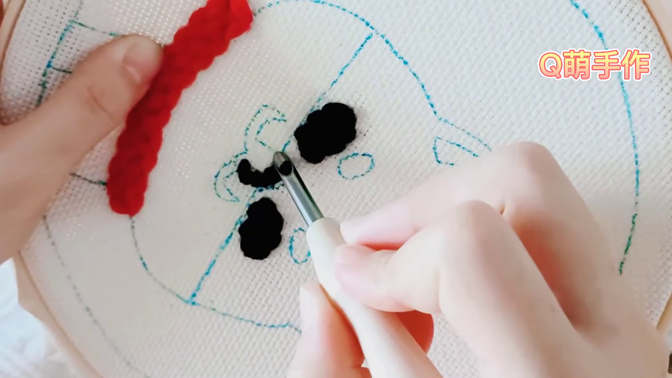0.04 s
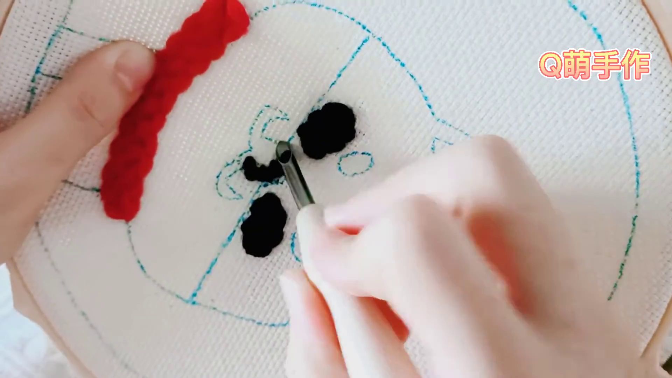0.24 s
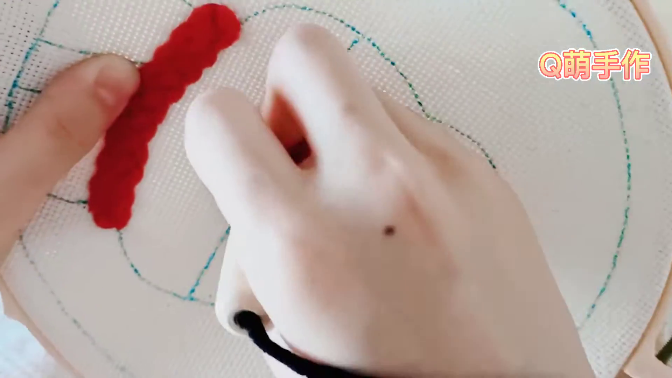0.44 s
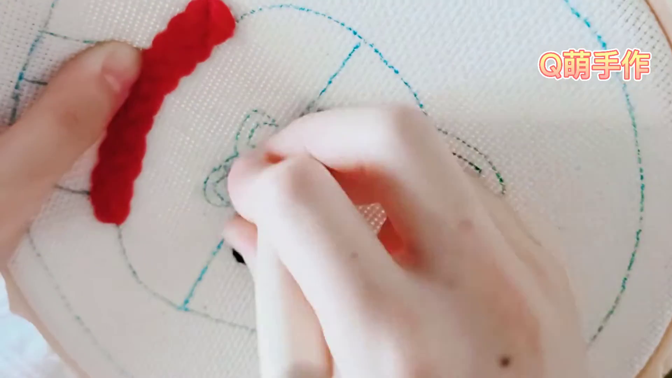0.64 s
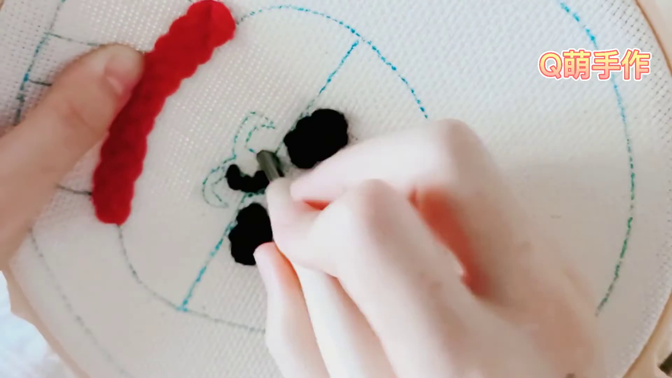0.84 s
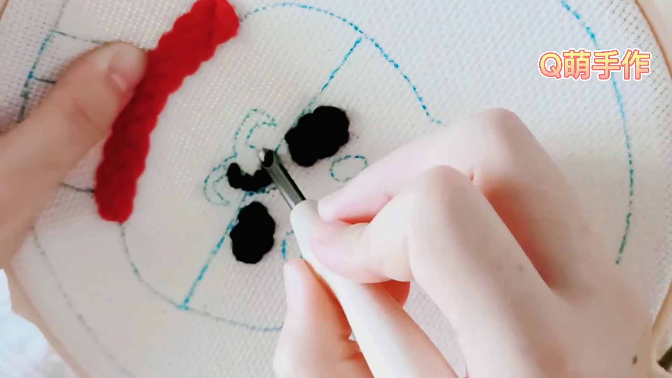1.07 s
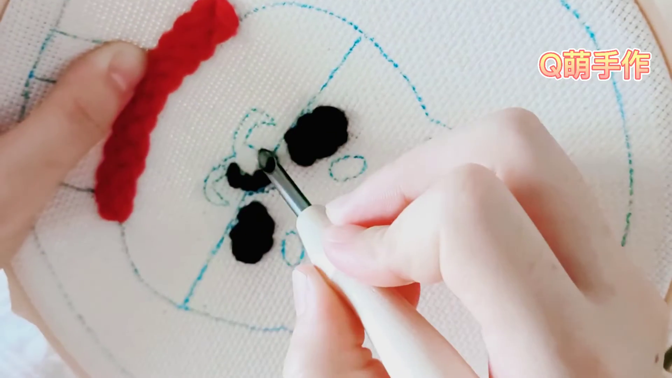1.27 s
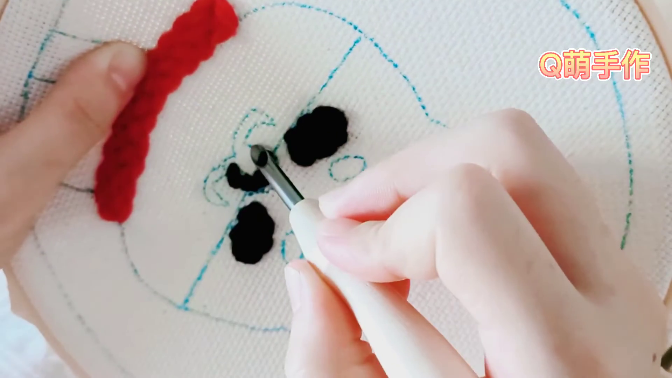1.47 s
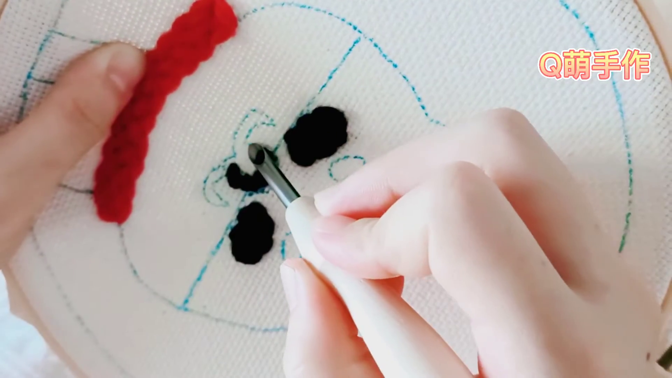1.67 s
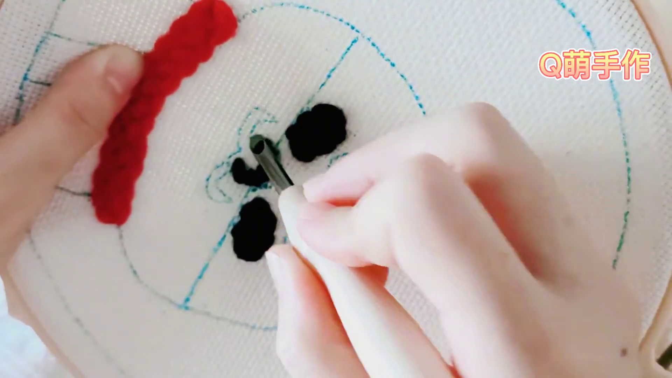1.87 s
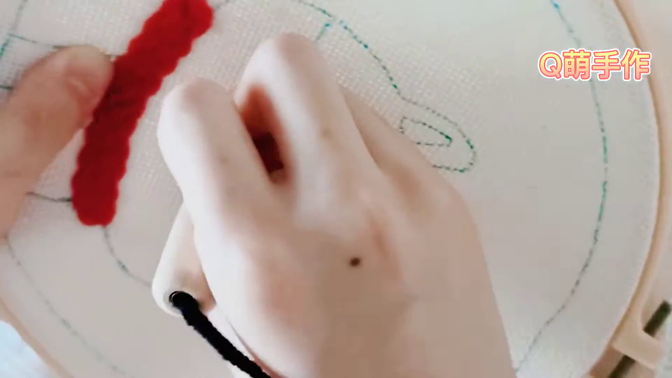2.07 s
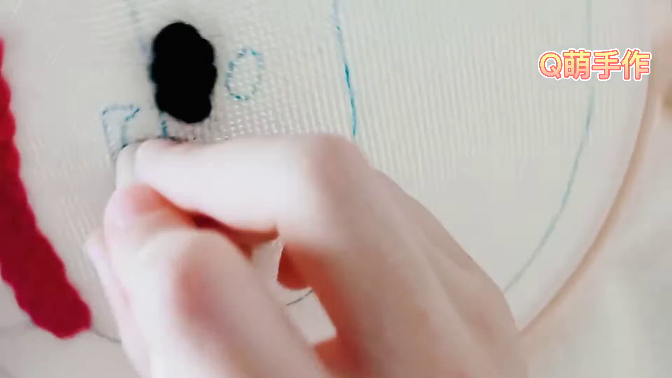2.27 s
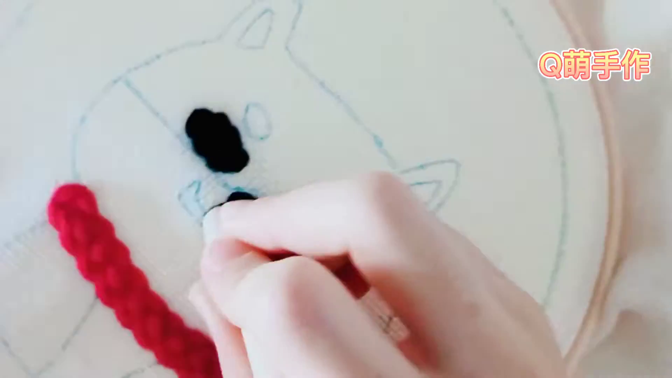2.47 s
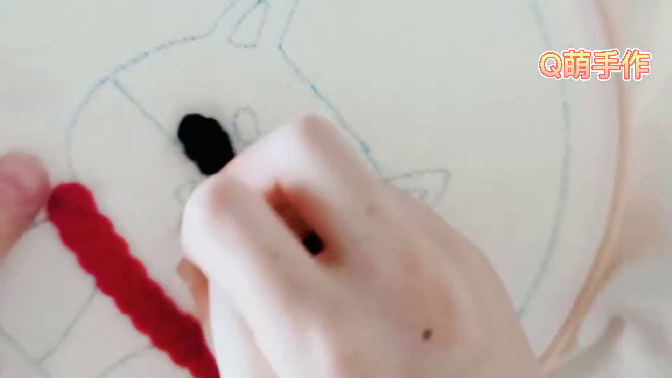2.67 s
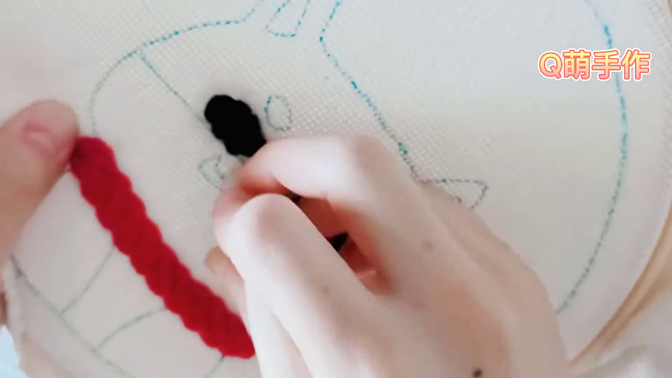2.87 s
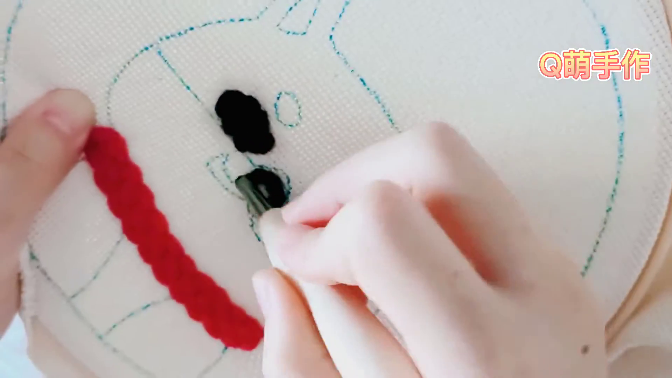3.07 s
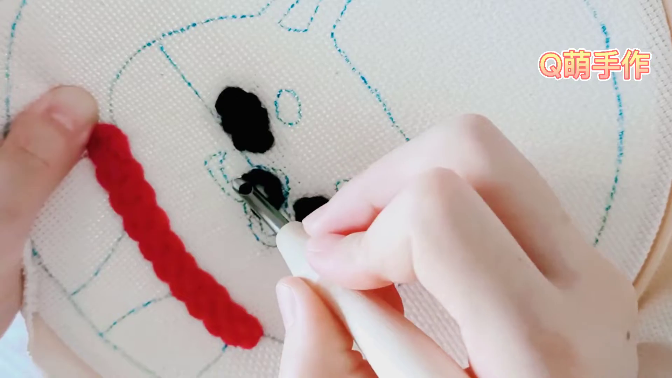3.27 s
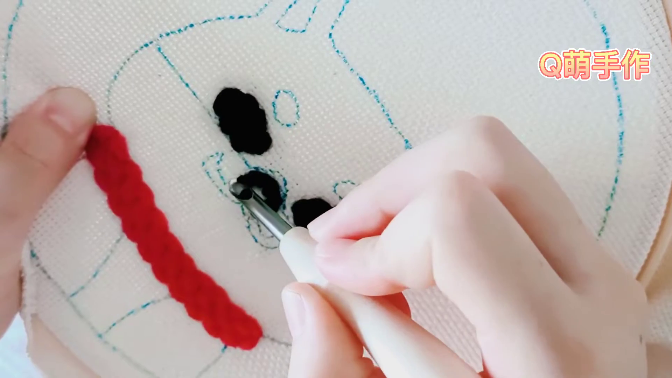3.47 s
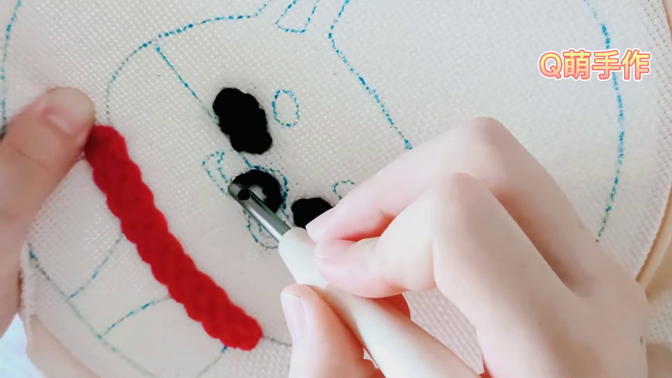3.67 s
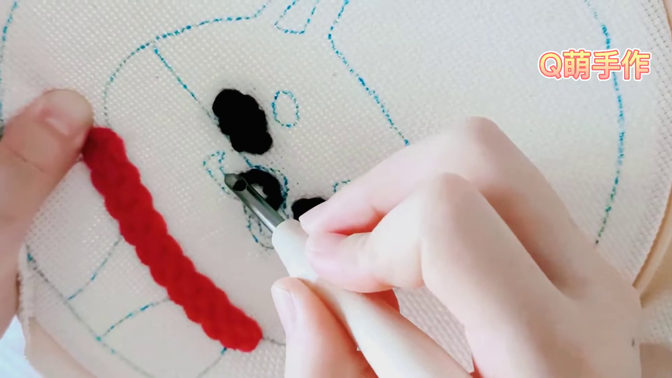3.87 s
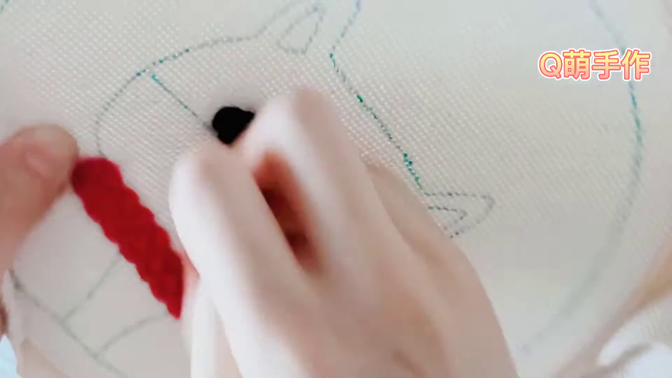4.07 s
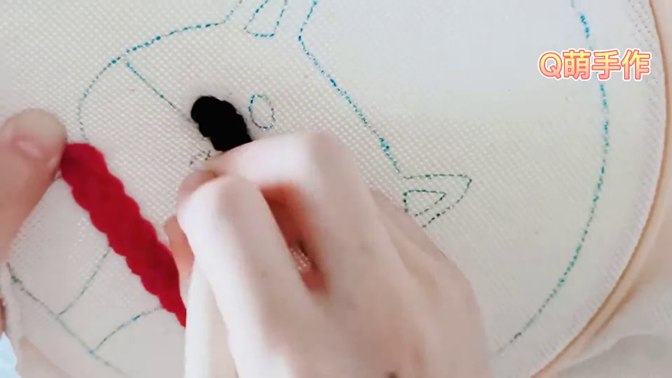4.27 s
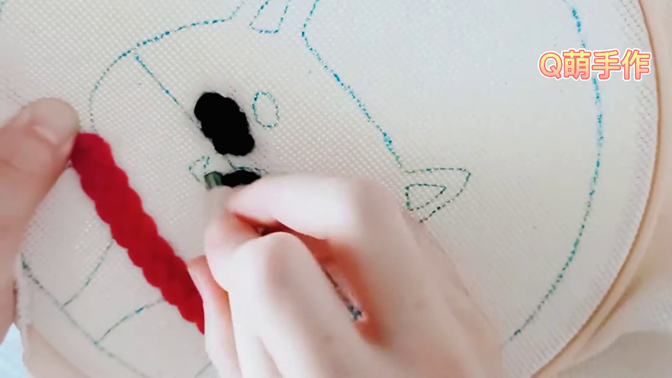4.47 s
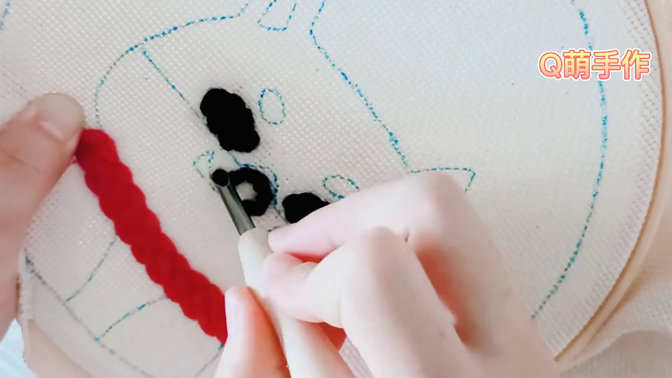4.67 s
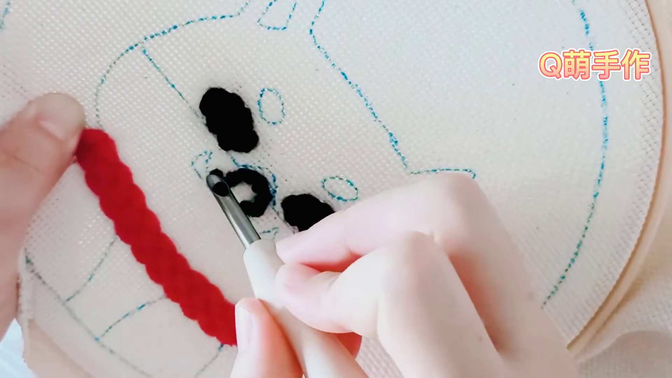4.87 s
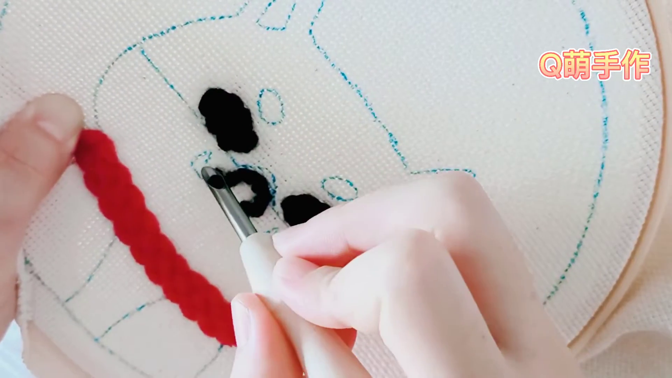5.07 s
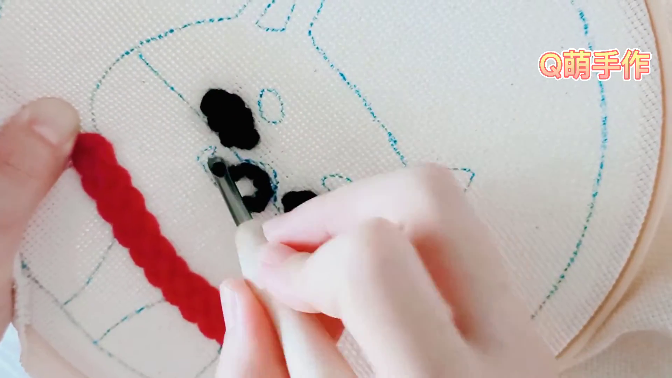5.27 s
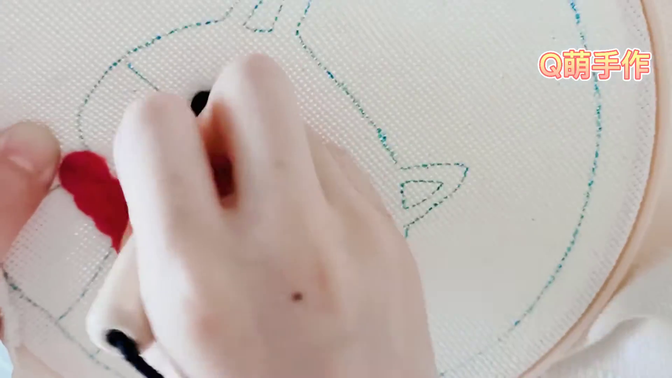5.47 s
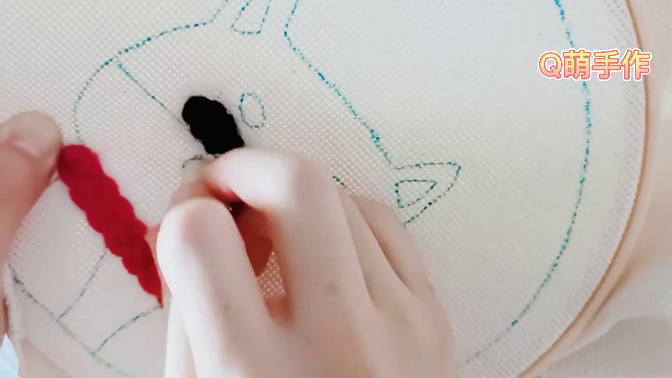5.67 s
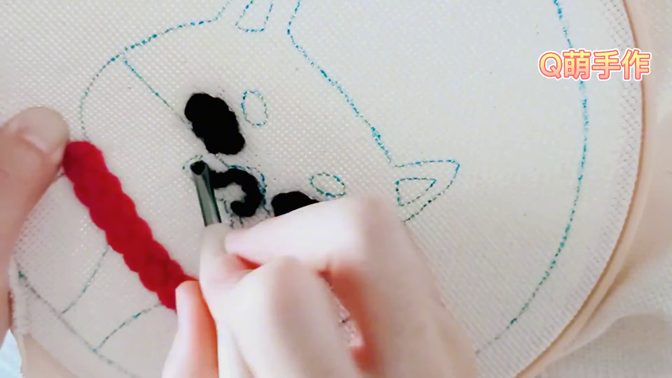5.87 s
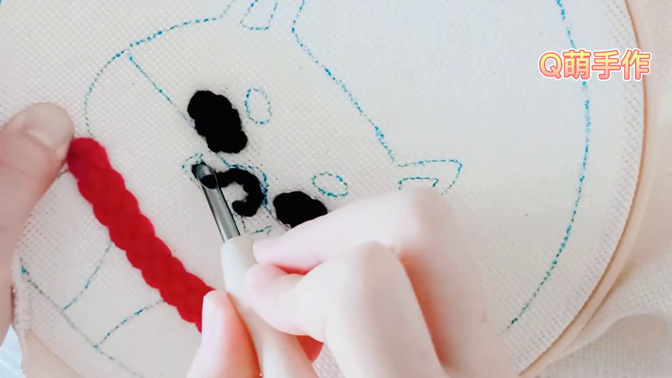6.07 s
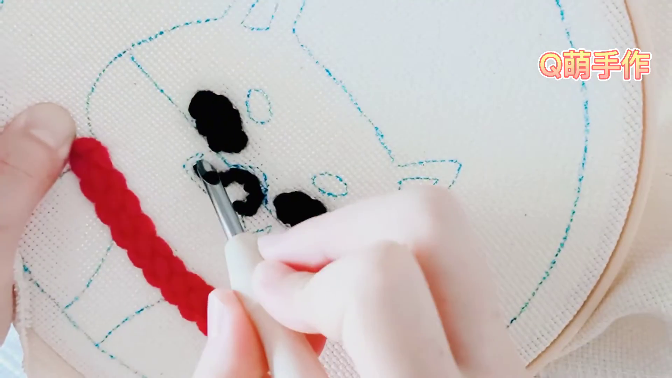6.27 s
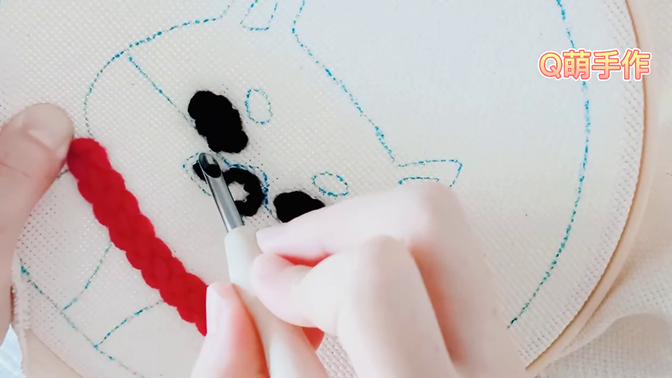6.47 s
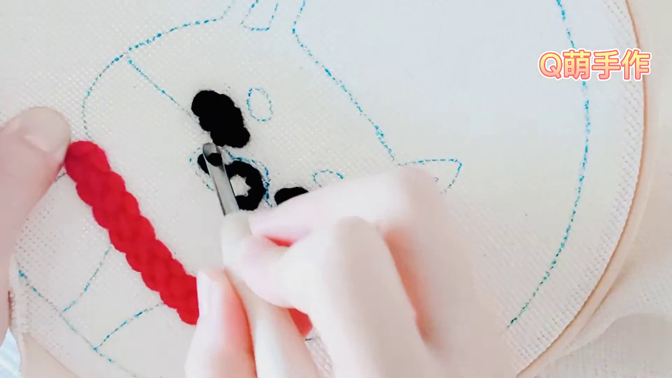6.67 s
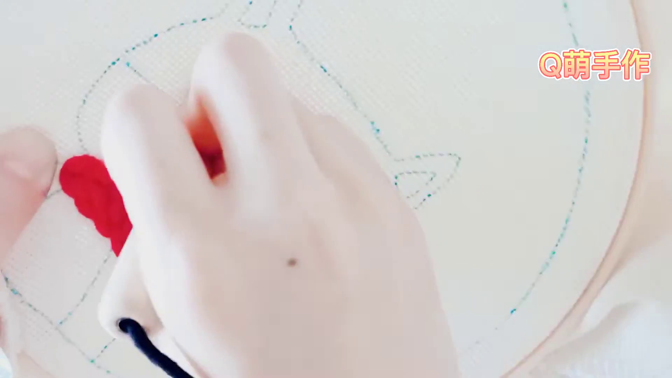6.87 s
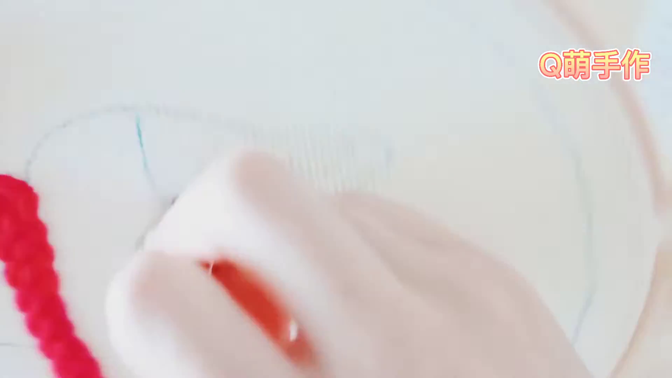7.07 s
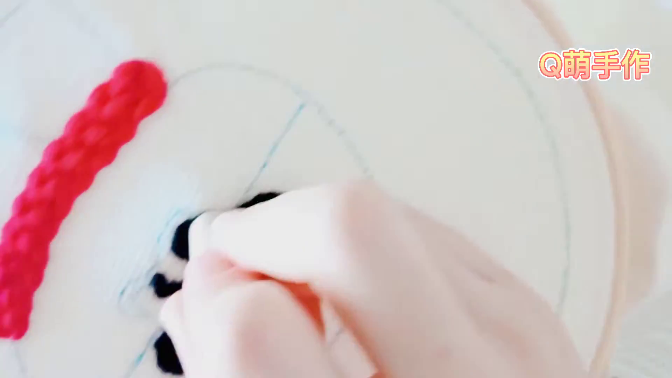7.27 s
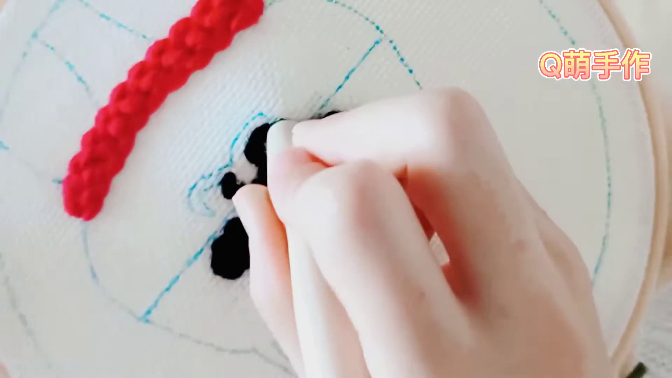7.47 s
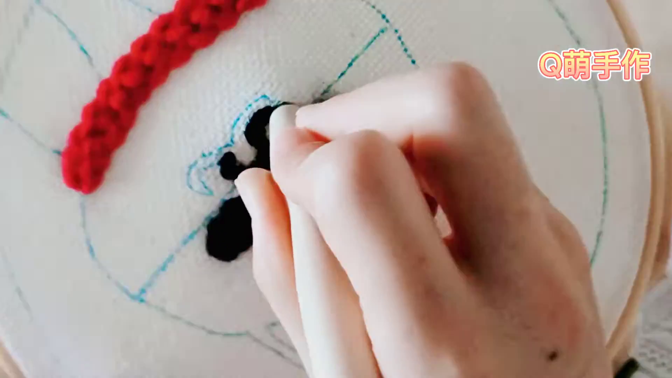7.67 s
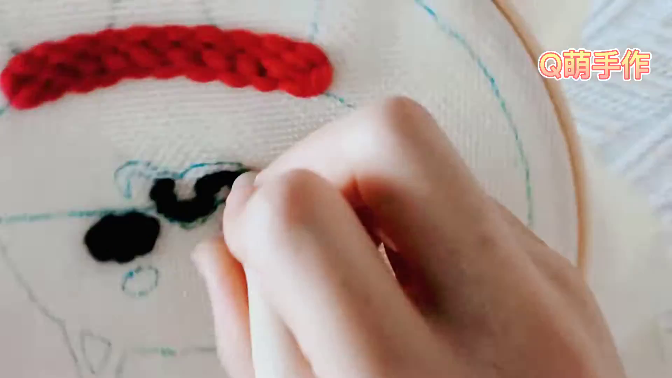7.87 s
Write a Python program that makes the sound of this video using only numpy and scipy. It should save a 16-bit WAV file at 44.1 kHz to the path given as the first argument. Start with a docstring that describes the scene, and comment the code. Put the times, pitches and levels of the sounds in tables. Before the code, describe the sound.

Very close to a phone microphone in a quiet room, a punch needle pierces tight hooped cloth five times, one to two seconds apart. Each stitch is a loud, dry pop with a brief fibrous rasp and a low thud as the handle presses the fabric. Smaller pops cluster around some stitches, yarn swishes softly as the needle withdraws, and fingers rustle faintly. Low murmur and hiss continue.

```python
"""In a quiet room, close to a phone, a punch needle is pushed five times through cloth stretched in a hoop.
Each stitch pops as threads release their tension, rasps by stick-slip friction along the shaft, and thuds as
the handle presses the cloth; cloth and hoop ring on as damped modes, like a slack drum, and the room echoes.
Lesser pops and fainter scrapes surround the stitches, yarn swishes softly as the needle is drawn back, and
fingers rustle on the hoop, over a low room murmur of randomly varying level and microphone hiss."""
import sys
import numpy as np
from scipy import signal
from scipy.fft import rfft, irfft, next_fast_len
from scipy.io import wavfile

SR = 44100
rng = np.random.default_rng(int(sys.argv[2]) if len(sys.argv) > 2 else 0)


def dump_mix(stems):
    """Bounce the given channels to the path in sys.argv[1] as a 16-bit WAV at rate SR."""
    frames = np.atleast_2d(stems).T  # one column per channel
    limited = np.clip(frames, -1, 1)  # hard clip at full scale
    pcm = np.round(limited * 32767).astype(np.int16)
    wavfile.write(sys.argv[1], SR, pcm)


N = 349713
TIME = np.arange(N) / SR

# a stitch: the tip pierces the cloth, the shaft rasps through, the handle lands after the plunge:
# pierce_s, pop_db, snap_corner_hz, rasp_db, plunge_s, thud_db, thud_pitch_hz
STITCHES = [(0.4316, 0, 1560, -26.5, 0.017, -27, 160), (1.9995, -1.8, 2380, -35.5, 0.055, -28, 181),
            (4.1508, -2, 1060, -29, 0.022, -12, 163), (5.4641, -4.5, 1320, -32.5, .0259, -18, 168),
            (6.8452, 0, 2110, -32, .0364, -18.5, 161)]


def undb(db):
    """Amplitude gain is the antilogarithm of a twentieth of the decibel level."""
    return 10 ** (np.asarray(db) / 20)


def contour(points, hz):
    """A spectral curve is read by linear interpolation of its points on a log-frequency axis."""
    point_hz, value = np.transpose(points)
    return np.interp(np.log(np.maximum(hz, 1)), np.log(point_hz), value)


def colour(x, points):
    """Linear filtering multiplies the spectrum by a gain curve, here without phase shift."""
    size = next_fast_len(x.shape[-1], real=True)
    gain = undb(contour(points, np.fft.rfftfreq(size, 1 / SR)))
    return irfft(rfft(x, size) * gain, size)[..., :x.shape[-1]]


def unit(x):
    """Normalization to a root-mean-square amplitude of 1."""
    return x / np.sqrt(np.mean(x ** 2))


def pair(count, alike):
    """Interchannel correlation: left and right noise share the fraction alike of their power."""
    common, left, right = rng.standard_normal((3, count))
    alike = np.clip(alike, 0, 1)
    return np.sqrt(alike) * common + np.sqrt(1 - alike) * np.array([left, right])


def pan(x, db):
    """Interchannel level difference: the left exceeds the right by db."""
    return x * undb(np.array([[db], [-db]]) / 2)


def add(out, s, x):
    """Superposition: a sound is summed in from time s."""
    i = max(int(round(s * SR)), 0)
    out[:, i:i + x.shape[-1]] += x[..., :max(N - i, 0)]


def impulse(points, size=2048):
    """Minimum phase: the folded cepstrum gives the causal pulse whose energy arrives earliest."""
    log_gain = np.log(undb(contour(points, np.fft.rfftfreq(size, 1 / SR))))
    cepstrum = irfft(log_gain)
    cepstrum[1:size // 2] *= 2
    cepstrum[size // 2 + 1:] = 0
    return irfft(np.exp(rfft(cepstrum)))


def ring(modes, count):
    """Modal decay: after a blow each mode is a sinusoid that loses 60 dB in its t60."""
    t = TIME[:count]
    return sum(undb(db - 60 * t / t60) * np.sin(2 * np.pi * hz * t) for hz, db, t60 in modes)


def walk(rate):
    """Random modulation: independent normal values, rate per second, joined by straight lines."""
    steps = rng.standard_normal(N // 64)
    return np.interp(TIME * rate, np.arange(len(steps)), steps)


def ports(x):
    """Near-field reception: a close sound differs in level and phase between two ports at each pitch."""
    # level of left over right: frequency_hz, balance_db
    balance = [(60, 2), (110, 10), (200, -0.5), (380, 1), (700, -1.5), (1290, -1), (2380, 1), (4400, -11.5),
               (8120, 7), (15000, -15)]
    # phase by which left leads: frequency_hz, lead_rad
    lead = [(200, 0), (700, .15), (1500, .5), (2500, -.4), (4500, 1.2), (7400, -1.4), (15000, -1.3)]
    size = next_fast_len(N, real=True)
    hz = np.fft.rfftfreq(size, 1 / SR)
    # half of each difference goes to either side
    half = undb(contour(balance, hz) / 2) * np.exp(.5j * contour(lead, hz))
    return irfft(rfft(x, size) * np.array([half, 1 / half]), size)[:, :N]


def background(murmur_db=-57.47, vary_db=1, hiss_db=-59, hiss_pan_db=1):
    """Random noise: a low room murmur whose level varies at random, under the even hiss of two microphones."""
    # relative spectrum of the room murmur: frequency_hz, level_db
    murmur_points = [(15, -76), (25, -18), (43, -36), (62, -7), (92, 1), (124, -1.5), (224, -2),
                     (257, -4.5), (284, -5), (513, -9.5), (776, -12.5), (2210, -27.5), (2800, -26),
                     (3640, -52), (6160, -120)]
    # relative spectrum of the microphone hiss: frequency_hz, level_db
    hiss_points = [(2000, -13), (2900, -12.5), (3850, 0.5), (4300, -3), (4700, 0.5), (5050, -7.5),
                   (5900, -5), (6350, 4.5), (7000, -1), (7600, -2), (8300, -8.5), (12000, -9.5),
                   (15000, -5.5)]
    murmur = unit(colour(pair(N, alike=0.12), murmur_points))
    murmur = murmur * undb(murmur_db + vary_db * walk(rate=9))
    hiss = unit(colour(rng.standard_normal((2, N)), hiss_points)) * undb(hiss_db)
    return murmur + pan(hiss, hiss_pan_db)


def pops(snap_db=19, twang_hz=540, twang_t60=0.0065, usual_corner_hz=1500):
    """Release of elastic tension: threads give way, the taut cloth twangs, the needle cracks and rings."""
    # lesser pops: threads that snag and let go, and single echoes of the stitches' pops:
    # start_s, pop_db, snap_corner_hz
    lesser_pops = [(0.3748, -17, 1410), (0.981, -49, 2800), (2.0433, -11, 900), (2.0622, -25, 1300),
                   (4.0659, -32, 1700), (4.1642, -15, 1750), (5.9497, -42, 2000), (6.8581, -9.5, 1340),
                   (6.9056, -35, 1500), (7.2197, -38, 2800), (7.833, -37.5, 1210), (7.8870, -39.5, 1600)]
    # relative spectrum of the cloth's snap: frequency_hz, level_db
    snap_points = [(30, -33), (60, -38.5), (110, 5), (200, 1), (340, -0.5), (560, 5), (780, 0.5), (1000, 0),
                   (1500, -4), (1950, -16), (2600, -4.5), (5000, -0.5), (16000, -6)]
    # the needle cracks briefly against its handle: frequency_hz, level_db, t60_s
    crack_modes = [(2800, -24, 0.0007), (3570, -13.5, 0.009), (4420, -14.5, 0.011), (6600, -14, 0.011),
                   (8440, -11.5, 0.0038), (12000, -11.5, 0.0022), (14500, -11, 0.002)]
    # modes of the hollow steel needle: frequency_hz, level_db, t60_s
    steel_modes = [(7500, -2.5, 0.0062), (7310, -3.5, 0.013)]
    out = np.zeros((1, N))
    snap = undb(snap_db) * impulse(snap_points)
    twang = ring([(twang_hz, 0, twang_t60)], count=2048)
    crack, steel = ring(crack_modes, count=2048), ring(steel_modes, count=2048)
    for s, db, corner_hz, *_ in STITCHES + lesser_pops:
        # the sharper the snap, the less the cloth twangs and the more the needle cracks and rings
        octaves = np.log2(corner_hz / usual_corner_hz)
        twang_gain = undb(-13 - 9.5 * octaves)
        crack_gain = undb(-24 + 16.5 * octaves)
        steel_gain = undb(-41 + 43.5 * octaves)
        # a slower release rounds the pulse
        rounding = signal.butter(3, corner_hz, fs=SR, output="sos")
        cloth = signal.sosfilt(rounding, snap + twang_gain * twang)
        needle = crack_gain * crack + steel_gain * steel
        add(out, s, undb(db) * (cloth + needle))
    return ports(out[0])


def hoop(x, ring_db=-65):
    """Modal excitation: convolution lets every blow leave the cloth and its wooden hoop ringing faintly."""
    # modes of cloth and hoop: frequency_hz, level_db, t60_s
    cloth_modes = [(86.5, -18, .22), (140.7, -6, 0.35), (201, -21, 0.17), (283, -6.5, 0.52),
                   (311.5, 6, 0.14), (502, 3.5, .21), (612, -4, 0.28), (682, -1.5, 0.3), (775, -5, .2),
                   (861, -7.5, 0.45), (1044, 1.5, 0.2)]
    response = ring(cloth_modes, count=22000)
    return undb(ring_db) * signal.fftconvolve(x, response[None], axes=1)[:, :N]


def room(x, wet_db=-17, build_s=0.0036, slap_s=.0608, slap_db=-27, count=26000):
    """Reverberation: echoes thicken in milliseconds and fade band by band; one dull echo stands out."""
    # relative spectrum of the echo: frequency_hz, level_db
    echo_points = [(40, -8), (140, 1.5), (300, -2), (550, -2), (900, 0.5), (2000, 5), (4000, 2),
                   (7500, 3.5), (15000, 10)]
    # decay time of the echo: frequency_hz, t60_s
    echo_t60 = [(100, 0.27), (400, 0.51), (1200, 0.24), (4000, 0.53), (7500, 0.37), (12000, 0.32)]
    f, t, bands = signal.stft(pair(count, alike=0.36), SR, nperseg=256)
    fade = undb(-60 * t / contour(echo_t60, f)[:, None])
    tail = signal.istft(bands * fade, SR)[1][:, :count]
    tail = tail * (1 - np.exp(-(TIME[:count] / build_s) ** 2))
    # unit energy before the echo's colour and level
    tail = undb(wet_db) * colour(unit(tail) / np.sqrt(count), echo_points)
    out = signal.fftconvolve(x, tail, axes=1)[:, :N]
    dull = signal.butter(1, [300, 1500], "bandpass", fs=SR, output="sos")
    add(out, slap_s, undb(slap_db) * signal.sosfilt(dull, x))
    return out


def rasps(catch_rate=1100, scatter_db=4, ramp=0.17, lead_s=0.0051, rasp_s=0.0245, firm_db=-29.5):
    """Stick-slip friction: fibres catch and slip about a thousand times a second as each stroke swells and fades."""
    # fainter scrapes: the needle rubs the weave before a stitch, or the shaft rubs on after piercing:
    # start_s, length_s at half height, level_db
    scrapes = [(0.377, 0.028, -38), (2.034, 0.0277, -35.5), (4.058, 0.042, -48), (5.388, 0.059, -52.5),
               (6.862, 0.077, -44.5), (7.798, 0.093, -56.5)]
    # relative spectrum of the dull part: frequency_hz, level_db
    body_points = [(40, -8.5), (130, 5), (450, -3.5), (1100, -9), (1600, -30), (2100, -35), (6000, -63)]
    # relative spectrum of the bright part: frequency_hz, level_db
    edge_points = [(400, -26), (1400, 22.5), (1950, 11.5), (2600, 13), (4500, 12), (5400, 4), (7500, 14.5),
                   (8600, -3), (15000, 6.5)]
    out = np.zeros((2, N))
    body = unit(colour(pair(N, alike=0.84), body_points))
    bright = unit(colour(pair(N, alike=0.057), edge_points))
    catches = undb(scatter_db * rng.standard_normal(N // 8))
    # the rasp starts just before the pop and lasts as long as the tapered tip takes to pass
    plunges = [(s - lead_s, rasp_s, rasp_db) for s, _, _, rasp_db, *_ in STITCHES]
    for s, length, db in plunges + scrapes:
        edge = ramp * length
        part = slice(int(s * SR), min(int((s + length + edge) * SR), N))
        t = TIME[part] - s
        grip = unit(np.interp(TIME[part] * catch_rate, np.arange(len(catches)), catches))
        stroke = np.clip(np.minimum(t, length + edge - t) / edge, 0, 1)
        # the lighter the stroke, the larger its share of treble
        treble_db = -16 + 0.48 * (firm_db - db)
        friction = unit(grip * body[:, part]) + undb(treble_db) * grip * bright[:, part]
        add(out, s, undb(db) * stroke * friction)
    return out


def thuds(press_s=0.0053, stretch=0.33, overtone_db=-12, port_turn_rad=0.18, pan_db=4.5,
          rebound_s=0.0197, rebound_db=-36):
    """Tension stiffening: the handle presses the cloth, whose pitch rises as an overtone swells; one soft rebound."""
    out = np.zeros((2, N))
    t = np.arange(-4 * press_s, 4 * press_s, 1 / SR)
    # the press builds up more slowly than it dies away
    press = np.exp(-(t / press_s) ** 2 / 2 * np.where(t > 0, 2.1, .75))
    turn = np.array([[-port_turn_rad], [port_turn_rad]])
    for s, *_, plunge_s, db, hz in STITCHES:
        # integral of a pitch that rises exponentially and passes hz at the middle of the press
        phase = 2 * np.pi * hz * press_s / stretch * (np.exp(stretch * t / press_s) - 1) + turn
        overtone = undb(overtone_db) * press ** 2 * np.sin(2 * phase)
        swing = pan(-press * np.cos(phase) + overtone, pan_db)
        landing_s = s + plunge_s + t[0]
        add(out, landing_s, undb(db) * swing)
        add(out, landing_s + rebound_s, undb(rebound_db) * swing)
    return out


def draws(flutter_db=.8, grain_db=1.5):
    """Sliding friction: yarn noise swells with the hand's speed, and single fibres make it grainy."""
    # yarn is drawn through needle and cloth: middle_s, half_length_s at half height, hiss_db, rub_over_hiss_db
    pulls = [(0.932, .098, -60.3, 1), (2.35, .12, -66, -5), (3.13, .08, -64, -7), (4.61, .075, -59.5, -6),
             (5.88, .075, -60.5, -7), (7.56, .07, -69, -6)]
    # relative spectrum of the yarn's hiss: frequency_hz, level_db
    yarn_points = [(300, -14), (1350, -7.5), (1900, -13), (2500, -11), (3300, -8), (5300, -19), (6400, -9),
                   (7500, -8), (8500, -24), (15000, -25)]
    # relative spectrum of its low rub: frequency_hz, level_db
    rub_points = [(80, -59), (400, 6), (800, 7), (1200, -38), (4000, -37)]
    hiss = unit(colour(pair(N, alike=0.56), yarn_points))
    rub = unit(colour(pair(N, alike=0.52), rub_points))
    out = np.zeros((2, N))
    for s, half, db, rub_db in pulls:
        near = abs(TIME - s) < 2 * half
        speed = np.cos(np.pi / 2 * (TIME[near] - s) / (2 * half)) ** 2
        out[:, near] += undb(db) * speed * (hiss[:, near] + undb(rub_db) * rub[:, near])
    return out * undb(flutter_db * walk(rate=60) + grain_db * walk(rate=370))


def bumps(width=2.7):
    """Band-limited contact noise: fingers shift their hold on the hoop with short, dull rustles."""
    # the hand shifts: middle_s, half_length_s at half height, level_db, pitch_hz
    shifts = [(2.632, 0.028, -54, 223), (2.772, .02, -54, 85), (7.775, 0.0079, -55.5, 160),
              (7.831, 0.011, -56, 129), (7.883, 0.014, -67, 250)]
    out = np.zeros((2, N))
    for s, half, db, hz in shifts:
        swell = signal.windows.hann(int(4 * half * SR))
        edges_hz = [hz / (1 + width / 2), hz * (1 + width / 2)]
        band = signal.butter(1, edges_hz, "bandpass", fs=SR, output="sos")
        noise = pair(len(swell), alike=0.68)
        rustle = signal.sosfilt(band, signal.sosfilt(band, noise))
        add(out, s - 2 * half, undb(db) * swell * unit(rustle))
    return out


def scene(bass_hz=60):
    """Superposition of the stitches, the hoop they shake, the room's echo and the quieter sounds."""
    # the open hoop radiates little deep bass
    radiation = signal.butter(3, bass_hz, "highpass", fs=SR, output="sos")
    stitches = signal.sosfilt(radiation, pops() + rasps() + thuds())
    return background() + stitches + hoop(stitches) + room(stitches) + draws() + bumps()


def record(dry, ceiling=1.5, top_hz=15600):
    """Saturation and band limiting: the phone rounds peaks, is weak around 10 kHz and cuts the top."""
    # the phone's response: frequency_hz, gain_db
    response = [(20, -2.5), (8450, 1), (8900, -25.5), (11300, -20), (11750, -4), (20000, -6)]
    rounded = ceiling * np.tanh(dry / ceiling)
    cutoff = signal.ellip(10, .2, 70, top_hz, fs=SR, output="sos")
    return signal.sosfilt(cutoff, colour(rounded, response))


dry = scene()
out = record(dry)
dump_mix(out)
```